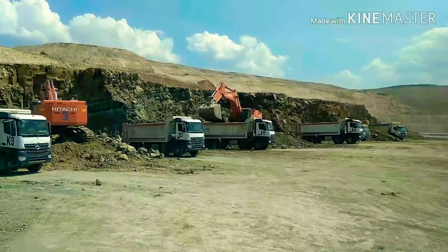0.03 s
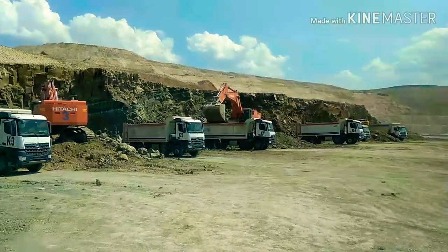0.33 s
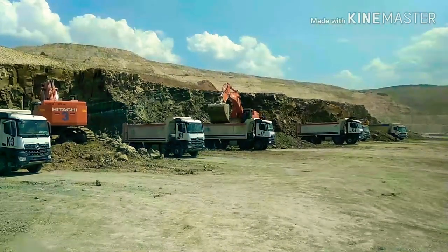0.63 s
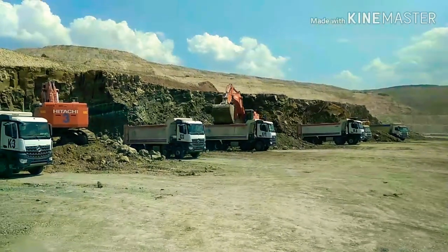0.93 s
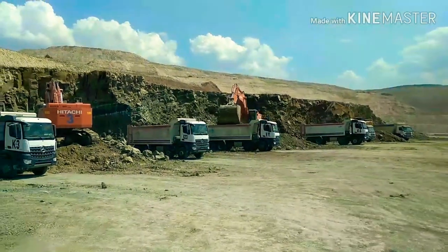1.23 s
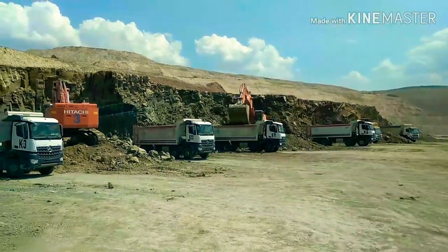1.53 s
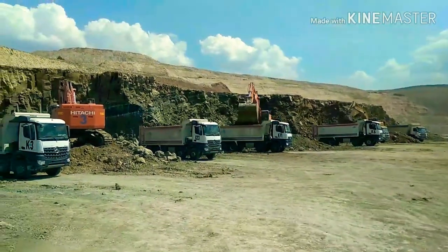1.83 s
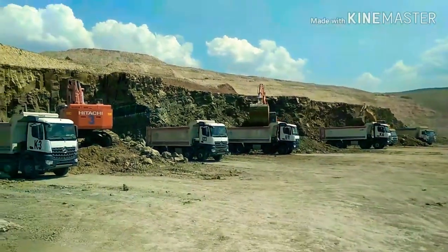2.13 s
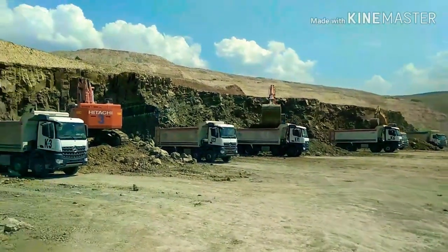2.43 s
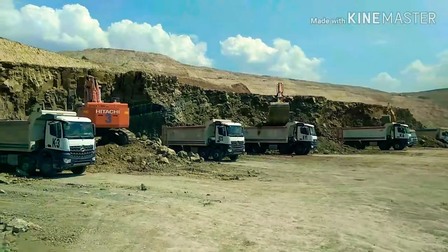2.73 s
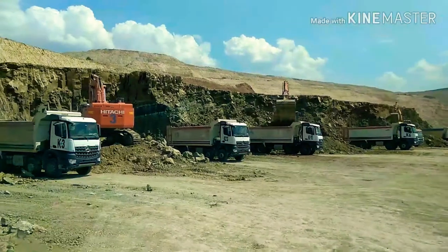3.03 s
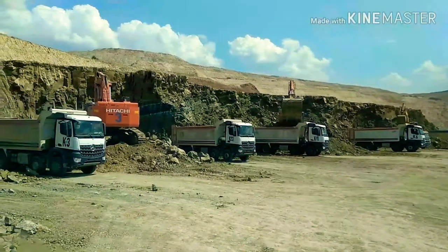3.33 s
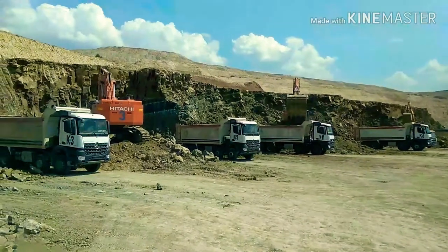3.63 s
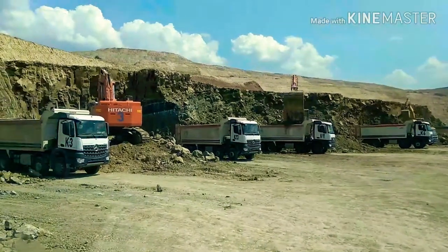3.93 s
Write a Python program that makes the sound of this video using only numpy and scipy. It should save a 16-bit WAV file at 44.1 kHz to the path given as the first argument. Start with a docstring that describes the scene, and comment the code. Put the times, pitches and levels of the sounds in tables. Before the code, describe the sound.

Distant heavy machinery drones as a dump truck revs up and stones faintly clatter.

```python
"""Distant open quarry

A dump truck pulls forward and revs up while a second truck and excavators run. Exhausts throb under
a roar of machinery and a wavering hydraulic hum. Grit hisses, a dry pivot squeaks, and stones clink,
knock and tumble among crisp ticks and soft swishes. Wind nudges a pair of microphone ports whose bass
is in opposite polarity."""
import sys
import numpy as np
from scipy import signal
from scipy.fft import rfft, irfft
from scipy.io import wavfile

SR = 44100
rng = np.random.default_rng(int(sys.argv[2]) if len(sys.argv) > 2 else 0)


def store_wav(level_fs):
    """Save 16-bit WAV to argv[1]."""
    pcm = np.round(np.clip(np.atleast_2d(level_fs), -1, 1) * 32767)
    wavfile.write(sys.argv[1], SR, pcm.T.astype(np.int16))


N = 176400
T = np.arange(N) / SR
HZ = np.fft.rfftfreq(N, 1 / SR)


def amp(db):
    """Decibels to gain."""
    return 10 ** (np.asarray(db) / 20)


def curve(rows, column=1):
    """An automation lane: one column of a table, ramped over time."""
    rows = np.array(rows)
    return np.interp(T, rows[:, 0], rows[:, column])


def eq_at(points, hz):
    """An EQ curve read on a log-frequency axis."""
    f, value = np.transpose(points)
    return np.interp(np.log(hz + 1), np.log(f + 1), value)


def drift(rate_hz):
    """A smooth random modulator with rms 1."""
    wander = irfft(rfft(rng.standard_normal(N)) * np.exp(-(HZ / rate_hz) ** 2) * (HZ > 0), N)
    return wander / wander.std()


def white():
    """Two unrelated channels of white noise."""
    return rng.standard_normal((2, N))


def swells(rows):
    """A bell-shaped envelope for each row of centre t/s, length/s, level/dB."""
    return sum(amp(db) * np.exp(-(2 * (T - s) / length) ** 2) for s, length, db in rows)


# Stereo image of the microphone ports: f/Hz, left-right correlation
CORRELATION = [(50, -.94), (130, -.9), (280, -.74), (390, -.7), (450, -.4), (650, -.2), (950, .15),
               (1300, .5), (2800, .3), (14000, .3)]
# Their tilt to the left: f/Hz, left minus right/dB
BALANCE = [(40, 3), (110, 0.27), (220, 1.5), (600, -3), (1200, 1), (2200, 1), (4000, 3.5), (7500, 0),
           (13000, -2)]
PORT_LAG_S, LAG_FROM_HZ = .00025, 1700  # treble reaches the left port slightly late


def ports(drive, eq, lowpass_hz=np.inf, peaks=()):
    """EQs two noise channels and blends them as the microphone ports hear them."""
    common, separate = rfft(drive)
    same = np.clip(eq_at(CORRELATION, HZ), -.995, .995)
    lean = amp(eq_at(BALANCE, HZ) / 2)
    lag = np.exp(-2j * np.pi * PORT_LAG_S * np.maximum(HZ - LAG_FROM_HZ, 0))
    left = common * lean * lag
    right = (same * common + np.sqrt(1 - same ** 2) * separate) / lean
    lowpass = 1 / np.sqrt(1 + (HZ / lowpass_hz) ** 6)
    bells_db = sum(db * np.exp(-((HZ - hz) / width) ** 2) for hz, width, db in peaks)
    return irfft(np.array([left, right]) * lowpass * amp(eq_at(eq, HZ) + bells_db), N) * np.sqrt(SR / 2)


def tone(hz, db, waver, rate_hz, apart_rad):
    """A sine wavering in level and phase, out of step between the two ports."""
    phase = 2 * np.pi * np.cumsum(hz * np.ones(N)) / SR
    wobble = 1 + waver * (drift(rate_hz) + 1j * drift(rate_hz))
    line = np.exp(1j * phase) * wobble / np.sqrt(.5 + waver ** 2)
    lean = amp(eq_at(BALANCE, np.mean(hz)) / 2)
    return amp(db) * np.array([line.real * lean, (line * np.exp(1j * apart_rad)).real / lean])


# The dump truck revving up: t/s, firing f/Hz
TRUCK_REVS = [(0, 24.4), (.55, 24), (.85, 24.84), (1.2, 28.55), (1.6, 28.92), (1.95, 30.56), (2.27, 35.2),
              (2.7, 35.82), (3.15, 37.7), (3.45, 35.87), (3.7, 35.83), (4, 35.35)]
# Fader on its fundamental: t/s, level/dB
TRUCK_FADER = [(0, -15.5), (.3, -15.5), (.58, -16.5), (.68, -18.5), (.77, -31.5), (.87, -23.5), (.97, -35),
               (1.13, -35), (1.21, -22), (1.29, -22.5), (1.38, -31), (1.47, -27.5), (1.57, -21.5),
               (1.61, -39), (1.79, -32.5), (1.88, -24.5), (2.1, -18.5), (2.22, -28), (2.42, -20.5),
               (2.7, -29), (3, -18), (3.08, -25), (3.16, -29.5), (3.22, -35.5), (3.4, -25), (3.53, -24),
               (3.64, -36.5), (3.76, -28.5), (3.88, -21), (4, -22.5)]
# Its exhaust overtones: harmonic number, level/dB
EXHAUST_OVERTONES = [(2, -33), (3, -47.5), (4, -48), (5, -56)]
# Engine load, riding those overtones: t/s, gain/dB
ENGINE_LOAD = [(0, -4), (1.9, -7.5), (2.3, 2.5), (2.7, -1), (3.1, -1.5), (3.3, -5.5), (3.65, -2.5), (4, -8)]
# The second truck, fading away: t/s, firing f/Hz, level/dB
OTHER_TRUCK = [(0, 34.7, -31), (.6, 36.7, -24), (.9, 44, -61), (1.3, 43.7, -55), (1.7, 41.14, -50),
               (2.2, 42.4, -53), (4, 46.1, -78)]


def trucks():
    """Exhausts throb at each truck's firing rate; load brings out the dump truck's overtones."""
    firing_hz = curve(TRUCK_REVS)
    out = tone(firing_hz, curve(TRUCK_FADER), waver=0.24, rate_hz=5.9, apart_rad=2.81)
    for k, db in EXHAUST_OVERTONES:
        out += tone(k * firing_hz, db + curve(ENGINE_LOAD), waver=0.1 * k, rate_hz=12, apart_rad=2.816)
    other = tone(curve(OTHER_TRUCK), curve(OTHER_TRUCK, column=2), waver=0.45, rate_hz=19, apart_rad=3.0)
    return out + other


# Excavator drone: multiple of the firing rate, level/dB
EXCAVATOR_PARTIALS = [(1, -37), (1.5, -49)]
# Its fader as it digs and swings: t/s, gain/dB
EXCAVATOR_FADER = [(0, 1), (1, -3.5), (1.8, -1.5), (2.6, -9), (3, -4.5), (3.6, -8), (3.9, 0), (4, 8)]
# Hum of two hydraulic pumps: t/s, f/Hz, level/dB
UPPER_PUMP = [(0, 254.3, -54), (.75, 247.7, -50), (1, 236.5, -49), (1.8, 236.2, -54), (2.15, 248.7, -55),
              (2.5, 231.6, -62.5), (3.15, 243.8, -45.5), (3.45, 237.1, -53.5), (4, 240.8, -45.5)]
LOWER_PUMP = [(0, 203.2, -58.5), (1, 195.3, -51), (1.399, 209.5, -59), (2.35, 201.2, -47.5),
              (3.3, 207, -51.5), (4, 208.9, -58)]
EXCAVATOR_FIRING_HZ = 87.74


def excavators():
    """A governed engine drones while the hydraulic pumps waver with the work."""
    fader_db = curve(EXCAVATOR_FADER)
    out = np.zeros((2, N))
    for k, db in EXCAVATOR_PARTIALS:
        out += tone(k * EXCAVATOR_FIRING_HZ, db + fader_db, waver=0.36 * k, rate_hz=6 * k, apart_rad=2.853)
    for pump in (UPPER_PUMP, LOWER_PUMP):
        out += tone(curve(pump), curve(pump, column=2), waver=0.24, rate_hz=5.8, apart_rad=2.04)
    return out


# Bass-heavy machinery bed: f/Hz, level/dB
ROAR_EQ = [(20, -92), (55, -54), (110, -60), (190, -62), (280, -69.5), (430, -78), (580, -82), (950, -85.5),
           (1130, -89), (1450, -93.5), (2000, -99.5), (3500, -103), (5500, -114), (14000, -122)]
# Its fader: t/s, gain/dB
ROAR_FADER = [(0, -3), (.8, -1), (1.5, -1), (2.2, 1), (2.6, 1), (3.1, 1.5), (3.45, 1.5), (3.65, 2), (4, 3)]
# Ringing panels and fan housings: f/Hz, width/Hz, gain/dB
PANEL_RINGS = [(379, 28, 1.5), (443.4, 14.8, 8), (680, 6.8, 6.5), (938, 90, 3), (1146, 13, 3.5),
               (1425, 34, 5), (1643, 17, 3.5), (2370, 230, -0.5), (3010, 23, 3.5), (3390, 22, 4.5),
               (3700, 33, 7), (4080, 260, 3.5)]
CLATTER_DEPTH = 0.049


def roar():
    """Distant engines and fans ring their panels, pulsing a little as the dump truck fires."""
    firing = np.cos(2 * np.pi * np.cumsum(curve(TRUCK_REVS)) / SR)
    bed = ports(white() * (1 + CLATTER_DEPTH * firing), ROAR_EQ, peaks=PANEL_RINGS)
    return bed * amp(curve(ROAR_FADER) + .5 * drift(rate_hz=9.8))


# Airy hiss of grit: f/Hz, level/dB
GRIT_EQ = [(300, -114), (2000, -104), (3500, -104), (5000, -105), (7800, -107.5), (9800, -106),
           (10700, -102.5), (11900, -102.5), (13100, -108), (14000, -120)]
# Its fader: t/s, gain/dB
GRIT_FADER = [(0, 2.5), (.17, -1), (.26, 0), (.6, -2.5), (.76, -4.5), (1.1, -12), (1.3, -11.5), (1.37, -7),
              (1.45, -13), (1.58, -13), (1.66, 0), (1.71, -0.5), (1.79, -16), (2.12, -6), (2.3, -1.5),
              (2.47, 4.5), (2.7, 1), (2.82, 3), (2.97, -1), (3.04, -5), (3.16, -1), (3.28, -5.5),
              (3.44, -7), (3.58, 4), (3.68, -6), (3.84, -5), (4, -9)]
GRAIN_DEPTH_DB, GRAIN_RATE_HZ = 1, 180


def grit():
    """Fine grit hisses in and out, with a fast flutter for grain."""
    grains = white() * amp(GRAIN_DEPTH_DB * drift(GRAIN_RATE_HZ))
    return ports(grains, GRIT_EQ) * amp(curve(GRIT_FADER))


# Sub rumble of wind: f/Hz, level/dB
WIND_EQ = [(3, -36), (11, -45), (22, -31), (45, -61), (120, -86), (400, -104)]
# Gusts: t/s, gain/dB
GUSTS = [(0, -13), (1, -28), (2, -19.5), (2.9, -6.5), (3.25, -16), (3.7, -13), (3.82, -3.5), (4, -8)]
# Single buffets: t/s, width/s, height at the left port
WIND_THUMPS = [(3.143, 0.0027, 0.26), (3.802, 0.0097, 0.21)]


def wind():
    """Wind buffets the microphone; its soft thumps push the two ports opposite ways."""
    rumble = ports(white(), WIND_EQ) * amp(curve(GUSTS))
    thumps = sum(height * np.exp(-abs(T - s) / width) for s, width, height in WIND_THUMPS)
    return rumble + thumps * np.array([[1], [-.75]])


# Tick cues: t/s, gain/dB
TICK_CUES = [(0.056, 2), (0.1436, 1), (2.132, -7), (2.182, 2), (2.2214, 3), (2.235, -7), (2.248, -1),
             (2.279, -2), (2.307, 2), (2.899, 9.5), (2.907, 12), (3.9011, 4)]
# Their crisp top end: f/Hz, level/dB
TICK_EQ = [(500, -128), (3000, -104), (7000, -105), (10500, -98), (13000, -100), (14500, -107)]
TICK_T60_S = 0.04


def ticks():
    """Crisp ticks and a brief rattle, in short bursts of treble."""
    snaps = sum((T >= s) * amp(db - 60 * np.maximum(T - s, 0) / TICK_T60_S) for s, db in TICK_CUES)
    return ports(white() * snaps, TICK_EQ)


# Small stone cues: t/s, f/Hz, level/dB before the channel gains
CLINK_CUES = [(0.056, 3580, -69), (0.143, 2670, -69), (0.143, 3310, -64), (2.183, 4400, -61.5),
              (2.184, 5150, -66.5)]
STONE_ATTACK_S, CLINK_T60_S, CLINK_WIDTH_HZ = 0.0017, 0.064, 590


def clinks():
    """Small stones ring briefly in narrow bands of noise, a little to the left."""
    out = np.zeros((2, N))
    for s, hz, db in CLINK_CUES:
        age = np.maximum(T - s, 0)
        ring = tone(hz, db - 60 * age / CLINK_T60_S, waver=3.3, rate_hz=CLINK_WIDTH_HZ, apart_rad=1.0)
        out += ring * np.minimum(age / STONE_ATTACK_S, 1)
    return out * amp([[6], [2]])


# Pivot cues: centre t/s, length/s, level/dB before panning
SQUEAK_CUES = [(.277, 0.033, -70), (.49, 0.014, -76)]


def squeaks():
    """A dry pivot gives two faint, thin squeaks on the left."""
    squeal = tone(hz=3700, db=0, waver=.5, rate_hz=29, apart_rad=1)
    return squeal * swells(SQUEAK_CUES) * amp([[3], [-3]])


# Stone hits: t/s, gain/dB, low-pass f/Hz, ring f/Hz
KNOCK_CUES = [(1.638, -11.5, 2140, 990), (1.689, -13.5, 2600, 1000), (2.901, -1, 12500, 1230),
              (2.908, -7.5, 4485, 700), (3.086, -10, 1290, 900), (3.321, -9.5, 3700, 1190),
              (3.371, -6.5, 3800, 965), (3.578, -7.5, 3250, 800), (3.622, -9.5, 2185, 1100),
              (3.649, -9, 1700, 750), (3.695, -8.5, 1600, 850), (3.832, -12, 2260, 1400)]
# Body of a hit: f/Hz, level/dB
KNOCK_EQ = [(60, -53), (200, -54), (430, -57), (800, -67.5), (1400, -69), (2200, -76.5), (3400, -74),
            (4500, -81.5), (5200, -77), (6300, -79), (9000, -80.5), (14000, -96)]
KNOCK_T60_S, RING_DB, RING_WIDTH_HZ = 0.074, 5, 96
ECHO_DB, ECHO_T60_S, ECHO_LOWPASS_HZ = -8.5, 0.28, 1510


def knocks():
    """Each stone lands with a dry crunch, rings at its own pitch and leaves a dark tail off the rock."""
    out = np.zeros((2, N))
    for s, db, lowpass_hz, ring_hz in KNOCK_CUES:
        age = np.maximum(T - s, 0)
        attack = amp(db) * np.minimum(age / STONE_ATTACK_S, 1)
        ring = [(ring_hz, RING_WIDTH_HZ, RING_DB)]
        crunch = white() * attack * amp(-60 * age / KNOCK_T60_S)
        echo = white() * attack * amp(ECHO_DB - 60 * age / ECHO_T60_S)
        out += ports(crunch, KNOCK_EQ, lowpass_hz, ring) + ports(echo, KNOCK_EQ, ECHO_LOWPASS_HZ, ring)
    return out


# Rubble showers: centre t/s, length/s, gain/dB
RUBBLE_CUES = [(2.58, 0.23, -13), (2.95, 0.048, -9), (3.12, 0.081, -9.5), (3.668, 0.082, -6.5)]
# Their low, boxy thud: f/Hz, level/dB
RUBBLE_EQ = [(60, -61), (200, -53), (450, -65.5), (700, -71), (1100, -84.5), (2000, -84), (4000, -102),
             (9000, -115)]
STONES_PER_S, STONE_SPREAD_DB = 1700, 3.5


def rubble():
    """Rubble falls into a truck bed in showers of small, dull impacts."""
    impacts = white() * (rng.random(N) < STONES_PER_S / SR)
    impacts *= amp(STONE_SPREAD_DB * np.minimum(rng.exponential(1, N), 3))
    return ports(impacts / impacts.std() * swells(RUBBLE_CUES), RUBBLE_EQ)


# Swish cues: centre t/s, length/s, gain/dB
SWISH_CUES = [(2.79, 0.11, 2), (2.95, 0.16, 0), (3.13, 0.19, -3.5), (3.75, 0.099, 0), (3.87, 0.038, 0.5),
              (3.96, 0.086, -3)]
# Their sibilant peak: f/Hz, level/dB
SWISH_EQ = [(1000, -124), (4000, -108), (5800, -99), (7000, -100), (8500, -112), (14000, -118)]


def swishes():
    """Soft, sibilant swishes like rustling cloth or breath, just left of centre."""
    return ports(white(), SWISH_EQ) * swells(SWISH_CUES) * amp([[1.5], [-1.5]])


def scene():
    """The mix: running beds with spot effects on top."""
    beds = trucks() + excavators() + roar() + grit() + wind()
    return beds + ticks() + clinks() + squeaks() + knocks() + rubble() + swishes()


def record(dry):
    """The recorder's band limit: a steep high cut."""
    high_cut = signal.firwin(255, cutoff=13700, window=("kaiser", 9), fs=SR)
    return signal.oaconvolve(dry, high_cut[None], "same")


dry = scene()
out = record(dry)
store_wav(out)
```